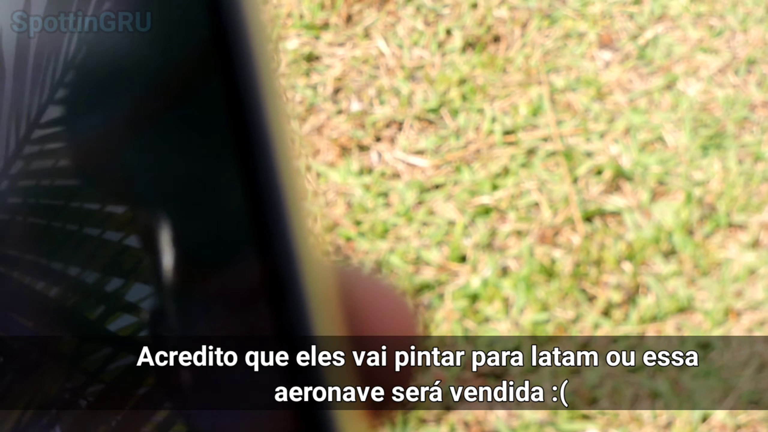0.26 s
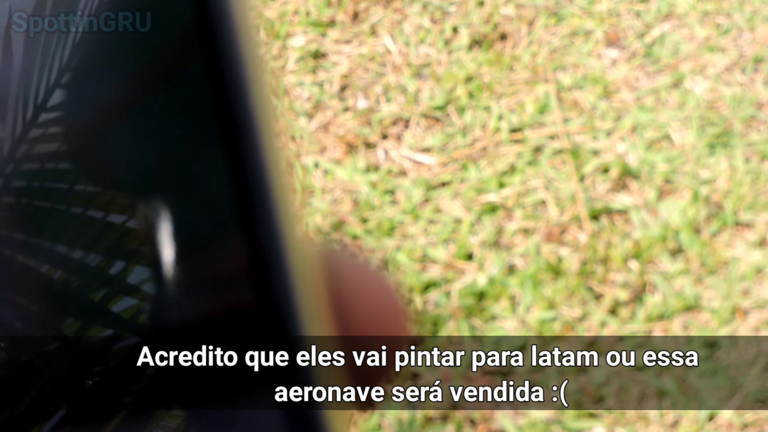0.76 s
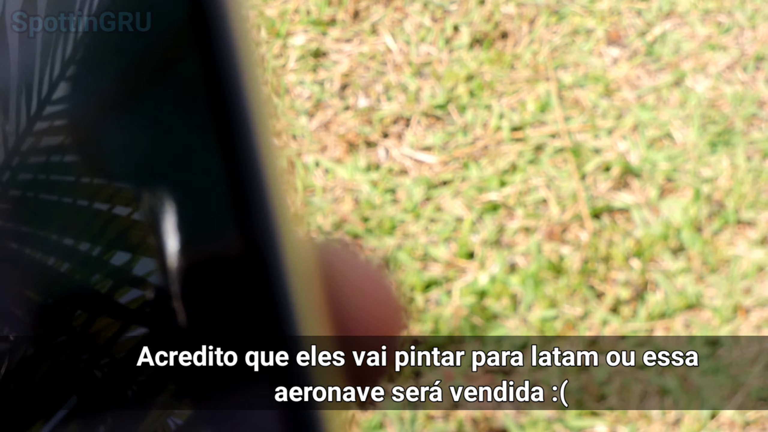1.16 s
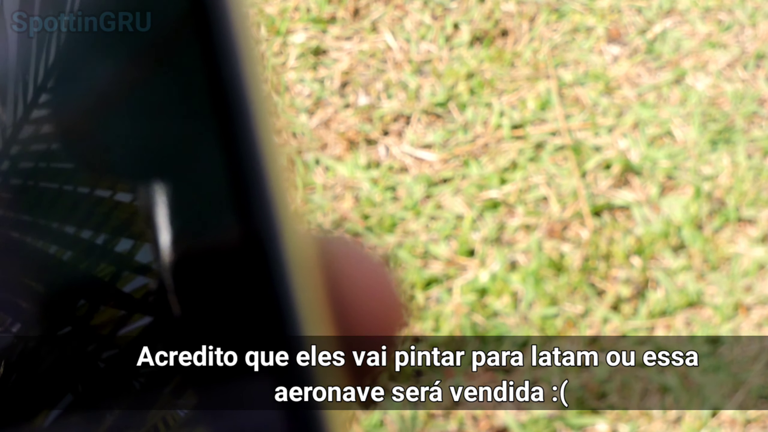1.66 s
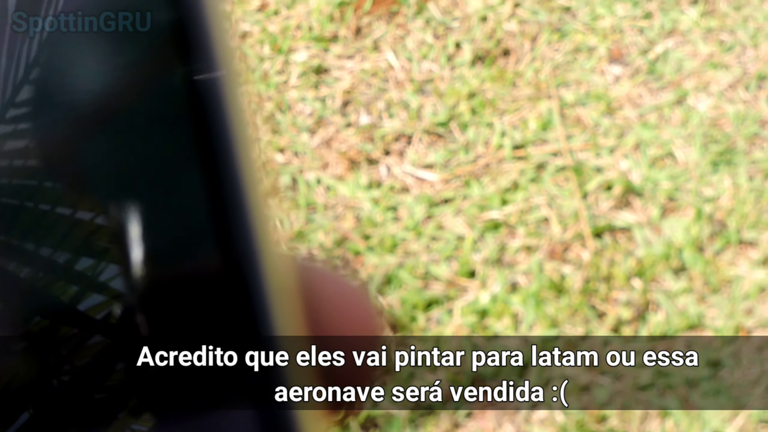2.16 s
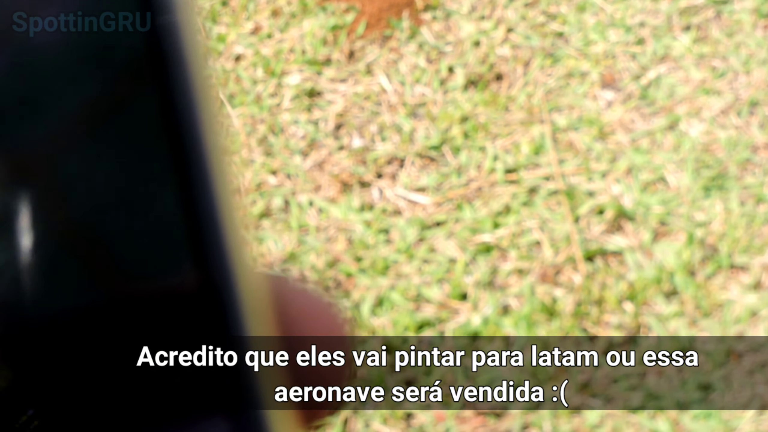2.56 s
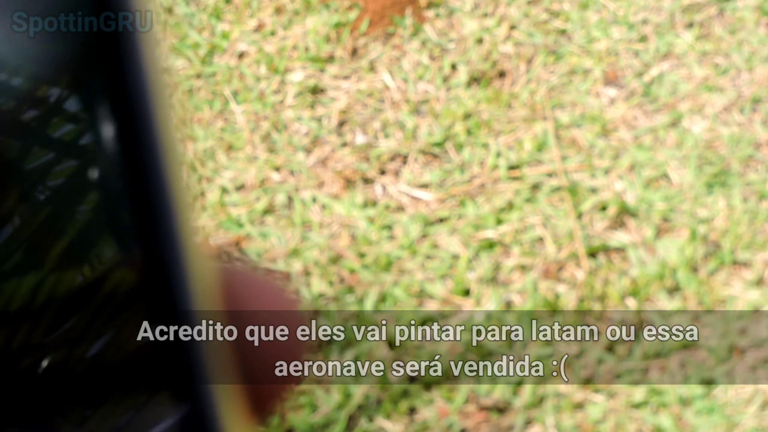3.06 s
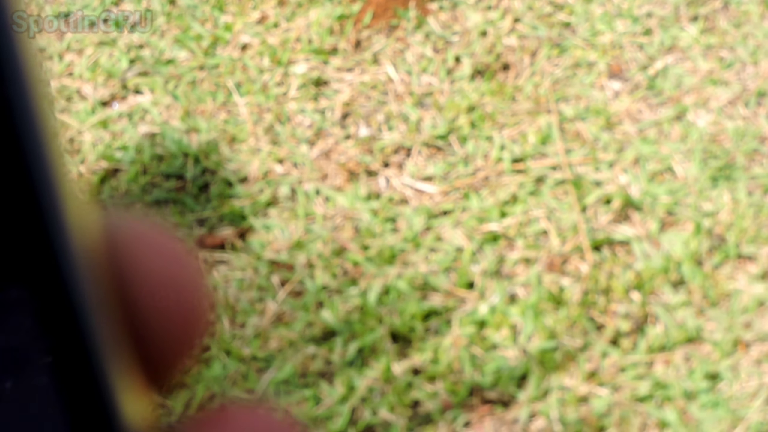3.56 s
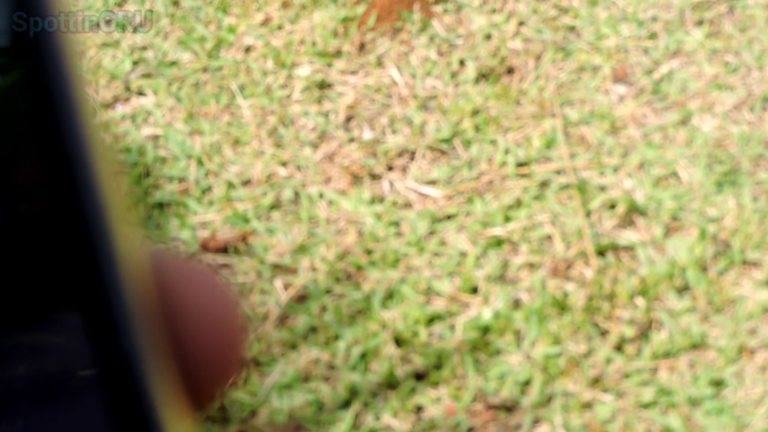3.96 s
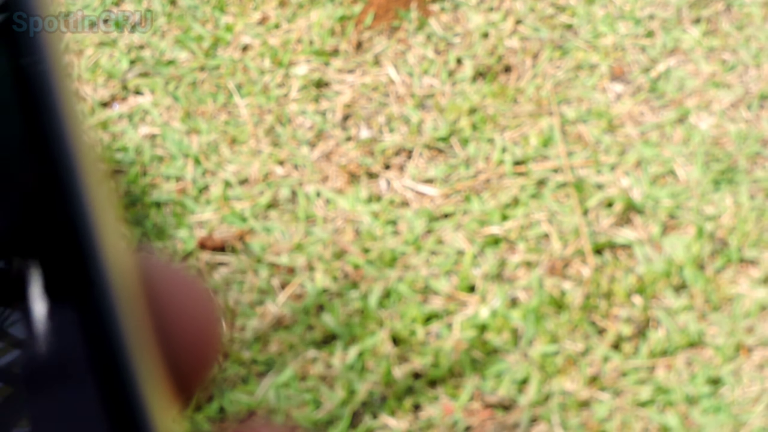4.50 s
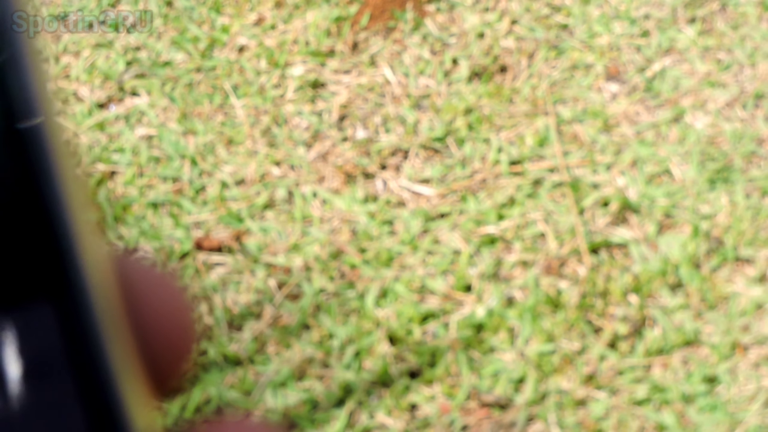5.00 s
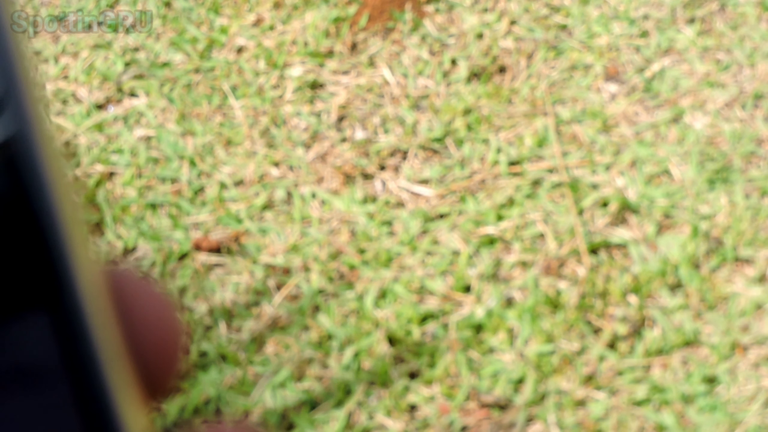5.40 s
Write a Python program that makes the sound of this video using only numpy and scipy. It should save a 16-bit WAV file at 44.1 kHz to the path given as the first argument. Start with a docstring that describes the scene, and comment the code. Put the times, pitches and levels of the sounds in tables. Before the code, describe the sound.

A deep, steady aircraft rumble fills the open air, with two far-off engines droning in it. The stronger one fades and drops in pitch, then returns and gradually climbs. Faint, thin two-note squeals sound midway through. Right by the microphone, fingers lightly tap and rub the casing of a hand-held device, and a single sharp click comes just before the end.

```python
"""A distant heavy engine pulls, eases off, drops in speed and slowly picks up again, its exhaust
sounding three tones. A second engine drones inside a wide rumble of turbulence, outdoors near an
airport, with a faint turbine whine and a few thin two-note squeals. Close by, fingers slide and tick
on a hand-held casing and set it ringing; a few dull taps come early, and near the end something
snaps with one sharp click."""
import sys
import numpy as np
from scipy import signal
from scipy.io import wavfile

SR = 44100
rng = np.random.default_rng(int(sys.argv[2]) if len(sys.argv) > 2 else 0)


def pcm_store(signal):
    """Save signal as 16-bit PCM."""
    levels = np.round(np.clip(np.atleast_2d(signal), -1, 1) * 32767)
    wavfile.write(sys.argv[1], SR, levels.astype(np.int16).T)


N = 248724


def main_engine():
    """Exhaust tones swell with effort and in resonances; uneven cylinders add shaft lines; gas rushes."""
    # engine run: time_s, firing_hz, effort_db (0 = full power)
    run = [(0, 78.43, 0), (.17, 79.4, 0.5), (.55, 82.56, -1), (.75, 83.85, -2), (.92, 81.15, -4),
           (1.03, 78.03, -8.5), (1.35, 79.8, -12), (1.65, 79.98, -11.5), (2.05, 73.28, -16.5),
           (2.27, 69.65, -8.5), (2.6, 71.7, -8), (2.78, 71.4, -10.5), (2.88, 64.8, -5.5), (3.4, 65.44, -3),
           (4.0, 67.53, -7), (4.6, 70.72, -6.5), (5.35, 74.47, -5), (5.64, 75.44, -7)]
    # exhaust response from pipe and ground reflection: freq_hz, level_db
    exhaust_colour = [(65, -32.5), (69, -27.5), (74.4, -12.5), (78, -21.5), (83, -16.5), (130, -20.5),
                      (143, -21.5), (150, -36), (157, -15), (166, -17.5), (195, -33), (203, -37.5),
                      (213, -26.5), (228, -28.5), (236, -23.5), (252, -27.5)]
    # weak shaft lines: shaft_multiple, relative_db
    shaft_orders = [(4, -11.5), (5, -16.5), (7, -4), (8, -16.5), (10, -10), (11, -12.5), (12, -11.5),
                    (13, -8), (14, -14.5), (15, -12), (16, -22), (17, -20.5), (18, -19.5)]
    pipe_hz, pipe_width_hz, pipe_db = 341, 26, 6.24  # exhaust pipe resonance
    firing_hz, effort_db = in_time(run)
    exhaust = 0
    for k in range(3):
        hz = (k + 1) * firing_hz
        drive_db = (1 + .15 * k) * effort_db  # brighter under load
        exhaust += tone(hz, drive_db + at_hz(exhaust_colour, hz), waver=.078)
    shaft_hz, shaft_db = firing_hz / 3, -31 + 1.39 * effort_db
    for order, db in shaft_orders:
        hz = order * shaft_hz
        lift_db = pipe_db / (1 + (2 * (hz - pipe_hz) / pipe_width_hz) ** 2)
        exhaust += tone(hz, shaft_db + db + lift_db, waver=.2)
    gas = hoarse_tone(hz=np.full(N, 648), level_db=effort_db - 55, rough=.98, spread_hz=110)
    return panned(exhaust, pan_db=-1.76) + panned(gas, pan_db=5)


def second_engine():
    """A steady drone and its octave, with a rough throb near half its pitch."""
    # engine drone: time_s, pitch_hz, fundamental_db, octave_db
    run = [(0, 92.3, -43.5, -41.5), (1.2, 94.86, -28, -27.5), (1.7, 94.36, -35, -41),
           (2.9, 97.27, -36.5, -42), (3.5, 97.72, -32.5, -30.5), (4.2, 97.2, -30.5, -36),
           (4.85, 97.36, -29, -34), (5.25, 97.48, -29.5, -42), (5.64, 96.68, -37, -40)]
    pitch_hz, fundamental_db, octave_db = in_time(run)
    drone = tone(pitch_hz, fundamental_db, waver=.09) + tone(2 * pitch_hz, octave_db, waver=.09)
    throb = tone(.52 * pitch_hz, level_db=-40, waver=.33)
    return panned(drone + throb, pan_db=-2.6)


def sharp_click():
    """A snap on the left reaches the right side later and weaker."""
    # snap and rebounds: start_s, level_db
    hits = [(5.4195, -5), (5.4201, -35), (5.4206, -20), (5.4210, -31)]
    # ring of the snap: freq_hz, gain_db, t60_s
    modes = [(1850, -17, 0.0031), (2830, -17.5, 0.0036), (4370, -17, 0.0026), (5970, -15, 0.0036),
             (7650, -17.5, 0.0046), (8430, -17.5, 0.0058), (10605, -6, 0.0015), (11980, -0.5, 0.00091),
             (13400, -4, 0.001)]
    lag_s = .00009
    left, right = panned(knocks(hits, modes), pan_db=6.5)
    right = np.interp(np.arange(N) - lag_s * SR, np.arange(N), right)
    return scattered(np.array([left, right]), tail_db=-4.5, t60_s=.025)


def fingers():
    """Sliding skin hisses and catches in ticks; both ring the casing, the hiss more so when pressed."""
    # finger strokes: start_s, length_s, level_db
    strokes = [(0.0, 0.072, -64.5), (0.874, 0.63, -64.5), (1.68, .22, -55.5), (1.83, 0.059, -52.5),
               (2.09, 0.58, -54), (2.134, .04, -51), (2.749, 0.33, -58), (3.2, .2, -61),
               (3.55, 0.13, -58.5), (4.981, 0.33, -65)]
    # skin hiss spectrum: freq_hz, density_db
    rub_colour = [(450, -8), (680, 10), (1300, -0.5), (2500, -5.5), (4000, -2), (6000, 2), (8000, 0.5),
                  (10800, -1), (13000, -3), (15500, -10)]
    # side of the hiss: freq_hz, pan_db
    rub_balance = [(500, 1), (2000, -0.5), (5000, 4.5), (10000, -2.5), (14000, 8.5)]
    # skin catching: start_s, level_db
    catches = [(0.969, -44), (1.099, -44), (1.639, -36), (1.645, -36), (1.686, -39), (1.844, -37),
               (2.182, -40), (3.222, -37), (3.375, -35.5), (3.557, -35.5), (3.965, -39)]
    # casing resonances: freq_hz, width_hz, gain_db
    case_modes = [(3770, 110, 4), (4630, 140, 8.5), (5500, 160, -6.5), (6160, 170, 0), (10000, 220, -2.5),
                  (10700, 220, -2.5)]
    grip_db = -64  # the resting grip hisses too
    slides = [from_db(db) * swell(start_s, length_s, attack_s=.071, release_s=.2)
              for start_s, length_s, db in strokes]
    rub = np.sqrt(from_db(grip_db) ** 2 + np.sum(np.square(slides), axis=0))
    friction = rub * banded_noise(rub_colour, rub_balance, flicker_db=1.74)
    pressure = np.sqrt(rub / rub.max())
    tick_band = signal.butter(1, [2500, 13000], "band", fs=SR, output="sos")
    ticks = signal.sosfilt(tick_band, impulses(catches))
    ticks = scattered(panned(ticks, pan_db=7), tail_db=8.5, t60_s=.027)
    return friction + ticks + resonances(pressure * friction + 1.55 * ticks, case_modes)


def taps():
    """Soft contacts with a short, dull ring."""
    # contacts: start_s, level_db
    hits = [(0.038, -34.5), (0.156, -44.5), (0.301, -38.5), (1.509, -44)]
    # ring of a tap: freq_hz, gain_db, t60_s
    modes = [(680, -4.5, 0.0067), (955, -2, .015), (1470, -5.5, .015), (2800, -10, 0.014)]
    return panned(knocks(hits, modes), pan_db=4)


def squeals():
    """Two close thin notes scoop up to pitch, with a faint octave; the weak squeals are hoarse."""
    # squeals: start_s, length_s, top_hz, level_db, roughness
    events = [(1.719, 0.21, 1065, -52.5, 0.6), (2.032, 0.21, 1050, -56.5, 1.03),
              (2.29, 0.424, 1079, -50.5, 0.06), (2.8, .27, 1059, -59, 0.9)]
    scoop_hz, settle_s = 35, .0617
    out = 0
    for start_s, length_s, top_hz, db, rough in events:
        age_s = np.maximum(np.arange(N) / SR - start_s, 0)
        upper_hz = top_hz - scoop_hz * np.exp(-age_s / settle_s)
        lower_hz = .933 * upper_hz
        upper = hoarse_tone(upper_hz, db, rough, spread_hz=27)
        lower = hoarse_tone(lower_hz, db - 2.5, rough, spread_hz=30)
        octave = hoarse_tone(2 * lower_hz, db - 18, rough=.82, spread_hz=38)
        out += swell(start_s, length_s, attack_s=.019, release_s=.041) * (upper + lower + octave)
    return panned(out, pan_db=4.5)


def rumble():
    """Distant turbulence: deep bass, a low roar and a wide wash above."""
    # turbulence strength: time_s, bass_db, roar_db, wash_db
    turbulence = [(0, -34.5, -26, -50.5), (1.3, -31, -30.5, -49), (2.3, -32, -32.5, -45),
                  (3.2, -27, -33, -47), (4.2, -28.5, -32, -48), (5.64, -30, -34, -47.5)]
    # spectra of the three layers: freq_hz, density_db
    bass_colour = [(15, -13.5), (24, -3), (32, -4.5), (40, -1.5), (50, -0.5), (60, 1), (80, -1), (110, -2),
                   (150, -17), (220, -52.5)]
    roar_colour = [(60, -16.5), (110, 3), (170, 6), (220, 1.5), (280, 0.5), (350, -4), (430, -13.5),
                   (520, -19), (700, -33), (1200, -54)]
    wash_colour = [(250, -10), (500, -7), (660, -4.5), (900, -4.5), (1200, -12.5), (2000, -9), (2700, -15),
                   (3300, -18), (4200, -20), (6000, -25.5), (9000, -33), (15000, -41.5)]
    # side of the rumble: freq_hz, pan_db
    balance = [(30, -5), (120, 1.5), (250, 2), (400, 2), (600, 5.5), (800, 6.5), (1300, 3), (2200, -2.5),
               (3500, 0), (6000, -4), (14000, -1.5)]
    # peaks from ground and walls: freq_hz, width_hz, gain_db
    wash_peaks = [(632, 59, -2), (1740, 20, -21), (3570, 140, -10.5)]
    bass_db, roar_db, wash_db = in_time(turbulence)
    bass = from_db(bass_db) * banded_noise(bass_colour, balance, flicker_db=1.5)
    roar = from_db(roar_db) * banded_noise(roar_colour, balance, flicker_db=1.5)
    wash = from_db(wash_db) * banded_noise(wash_colour, balance, flicker_db=.92)
    return bass + roar + wash + resonances(wash, wash_peaks)


def turbine_whine():
    """A faint, blurred high line comes and goes, arriving from all around."""
    # swells of whine: start_s, length_s, pitch_hz, level_db
    whines = [(0.0, .65, 2630, -64.5), (0.0, .6, 3430, -68.5), (4.5, 1.0, 2667, -70)]
    out = 0
    for start_s, length_s, hz, db in whines:
        sides = [hoarse_tone(np.full(N, hz), db, rough=.85, spread_hz=130) for _ in range(2)]
        out += swell(start_s, length_s, attack_s=.3, release_s=.3) * np.array(sides)
    return out


def tone(hz, level_db, waver):
    """A sine whose strength and phase are shaken by moving air."""
    phase = 2 * np.pi * (np.cumsum(hz) / SR + rng.random())
    shaken = (1 + waver * drift(5.9)) * np.sin(phase) + waver * drift(8.8) * np.cos(phase)
    return np.sqrt(2) * from_db(level_db) * shaken


def hoarse_tone(hz, level_db, rough, spread_hz):
    """A sine in a narrow band of noise; rough is the noise's share of the power."""
    phase = 2 * np.pi * np.cumsum(hz) / SR
    rough = np.clip(rough, 0, 1)
    blur = drift(spread_hz) * np.sin(phase) + drift(spread_hz) * np.cos(phase)
    return from_db(level_db) * (np.sqrt(2 * (1 - rough)) * np.sin(phase) + np.sqrt(rough) * blur)


def banded_noise(colour, balance, flicker_db):
    """Unit-rms stereo noise; each band has its own flicker, width and side."""
    # likeness of left and right: freq_hz, correlation
    likeness = [(30, .9), (100, .985), (250, .975), (450, .9), (640, .76), (1000, .4), (1400, .15),
                (2200, -.22), (3100, -.22), (7000, .05), (15000, .15)]
    edges_hz, run_in = np.geomspace(16, 17000, 25), SR // 4
    white = rng.standard_normal((2, 2, N + run_in))
    out = 0
    for k, (low_hz, high_hz) in enumerate(zip(edges_hz, edges_hz[1:])):
        hz = np.sqrt(low_hz * high_hz)
        flicker = drift(23)
        if not colour[0][0] < hz < colour[-1][0]:
            continue
        bandpass = signal.butter(2, [low_hz, high_hz], "band", fs=SR, output="sos")
        mid, side = signal.sosfilt(bandpass, white[k % 2])[:, run_in:]
        alike = at_hz(likeness, hz)
        band = np.sqrt(1 + alike) * mid + np.sqrt(1 - alike) * side * [[1], [-1]]
        out += from_db(at_hz(colour, hz) + flicker_db * flicker) * panned(band, at_hz(balance, hz))
    return rms_one(out)


def knocks(hits, modes):
    """Contacts set decaying modes ringing."""
    clicks, out = impulses(hits), 0
    for k, (hz, db, t60_s) in enumerate(modes):
        r, w = from_db(-60 / (t60_s * SR)), 2 * np.pi * hz / SR
        ring = signal.lfilter([np.sin(w)], [1, -2 * r * np.cos(w), r * r], clicks)
        out += (-1) ** k * from_db(db) * ring
    return out


def impulses(hits):
    """One impulse per hit."""
    clicks = np.full(N, 1e-18)
    for start_s, db in hits:
        clicks[round(start_s * SR)] += from_db(db)
    return clicks


def resonances(x, modes):
    """Parallel two-pole resonators, each with its given peak gain."""
    out = 0
    for hz, width_hz, db in modes:
        r, w = np.exp(-np.pi * width_hz / SR), 2 * np.pi * hz / SR
        gain = from_db(db) * (1 - r * r) / 2
        out += gain * signal.lfilter([1, 0, -1], [1, -2 * r * np.cos(w), r * r], x)
    return out


def scattered(x, tail_db, t60_s):
    """Nearby surfaces add a short diffuse tail, different on each side."""
    t = np.arange(SR // 10) / SR
    tail = rng.standard_normal((2, len(t))) * from_db(-60 * t / t60_s)
    tail /= np.sqrt(np.sum(tail ** 2, axis=1, keepdims=True))
    return x + from_db(tail_db) * signal.fftconvolve(x.mean(axis=0)[None], tail, axes=1)[:, :N]


def swell(start_s, length_s, attack_s, release_s):
    """Envelope: rises around the start, holds, dies away."""
    t = np.arange(N) / SR - start_s
    return np.clip(.5 + t / attack_s, 0, 1) * np.exp(-np.maximum(t - length_s, 0) / release_s)


def drift(rate_hz):
    """Slow unit-rms wander: noise through two one-pole low-passes."""
    hop, run_in = 40, 2000
    r = np.exp(-2 * np.pi * rate_hz * hop / SR)
    white = rng.standard_normal(N // hop + run_in + 2)
    slow = signal.lfilter([1], [1, -2 * r, r * r], white)[run_in:]
    return np.interp(np.arange(N) / hop, np.arange(len(slow)), rms_one(slow))


def in_time(rows):
    """Interpolate each column at every sample."""
    time_s, *columns = np.transpose(rows)
    return [np.interp(np.arange(N) / SR, time_s, column) for column in columns]


def at_hz(points, hz):
    """Read a curve on a log-frequency axis."""
    freq_hz, values = np.transpose(points)
    return np.interp(np.log(hz), np.log(freq_hz), values)


def panned(x, pan_db):
    """Place a sound; pan_db is left minus right."""
    return x * from_db(np.array([[.5], [-.5]]) * pan_db)


def from_db(db):
    """Decibels to gain."""
    return 10 ** (np.asarray(db) / 20)


def rms_one(x):
    """Scale to unit rms."""
    return x / np.sqrt(np.mean(x ** 2) + 1e-20)


def scene():
    """Engines and rumble far off, small sounds near."""
    outdoors = main_engine() + second_engine() + squeals() + rumble() + turbine_whine()
    return outdoors + fingers() + taps() + sharp_click()


def record(dry):
    """Steep low-pass."""
    cutoff_hz = 15700
    return signal.sosfilt(signal.ellip(10, .1, 80, cutoff_hz, fs=SR, output="sos"), dry)


dry = scene()
out = record(dry)
pcm_store(out)
```